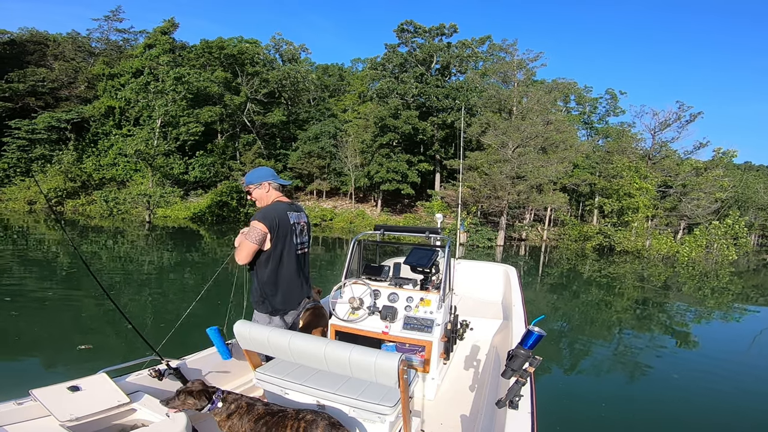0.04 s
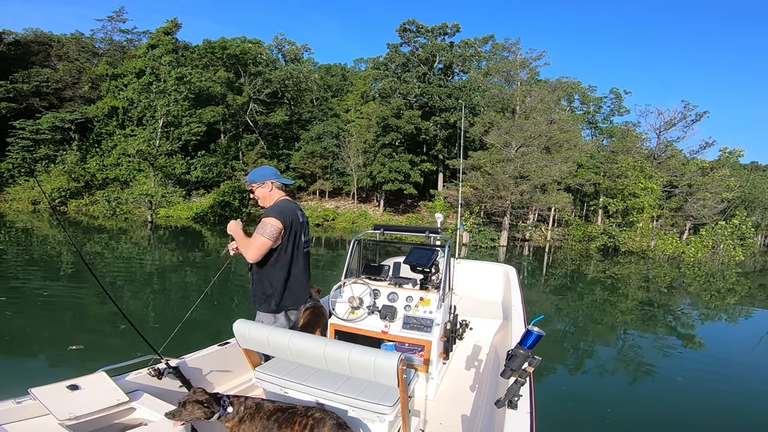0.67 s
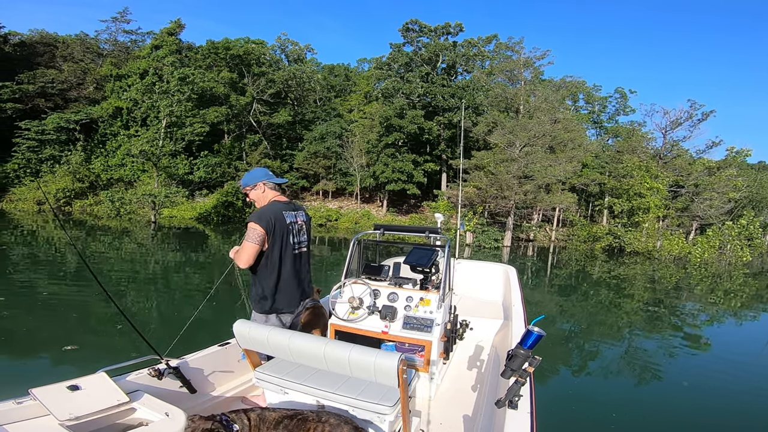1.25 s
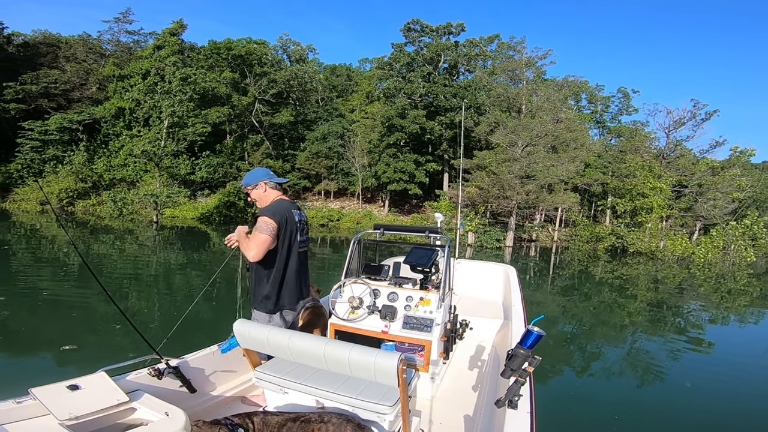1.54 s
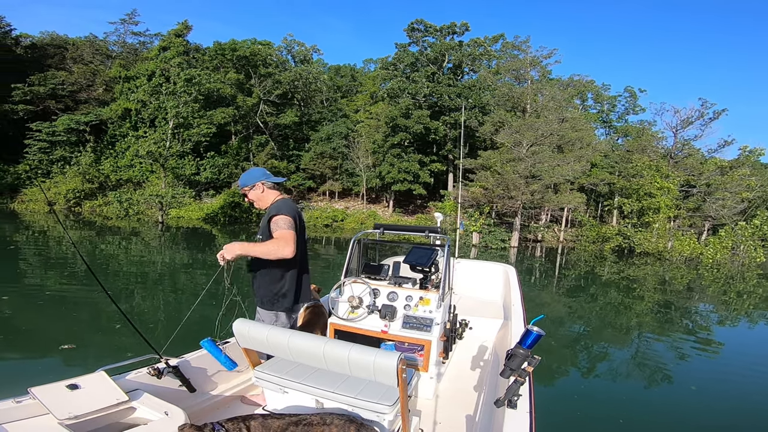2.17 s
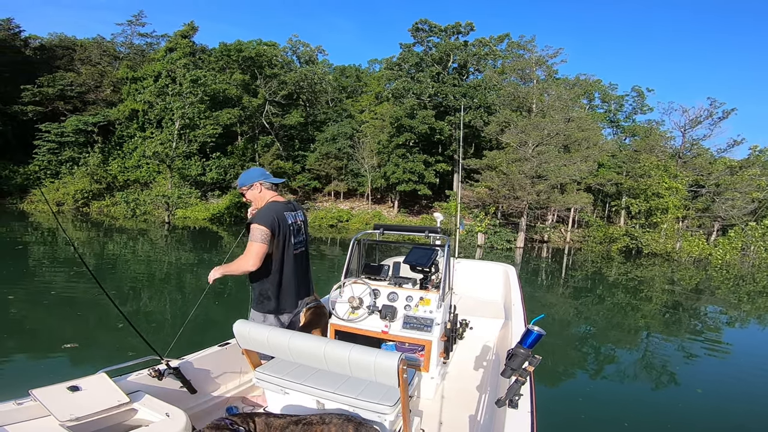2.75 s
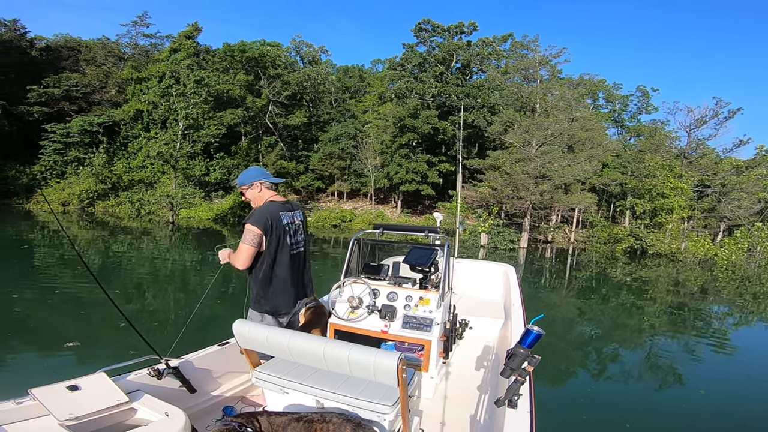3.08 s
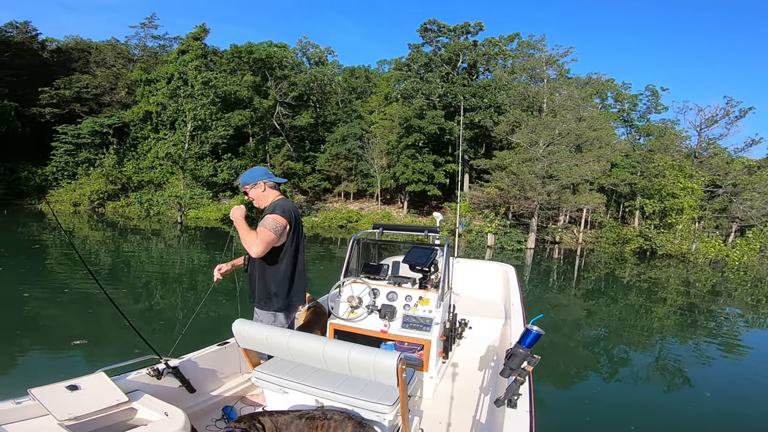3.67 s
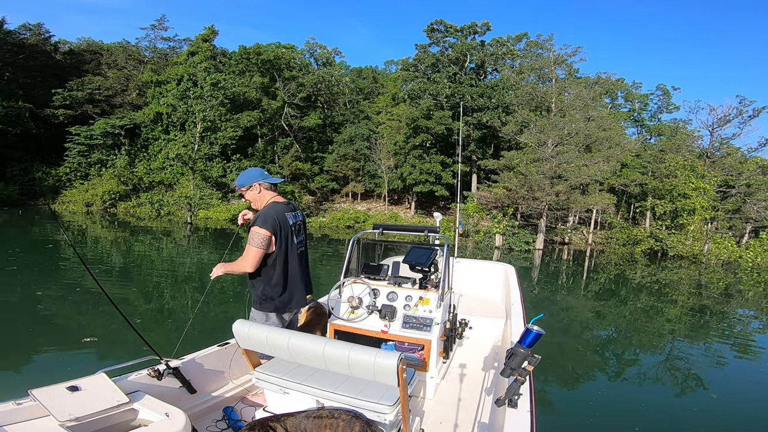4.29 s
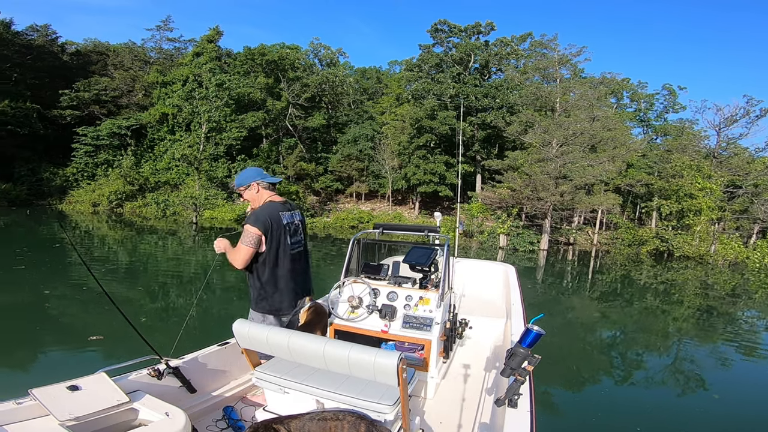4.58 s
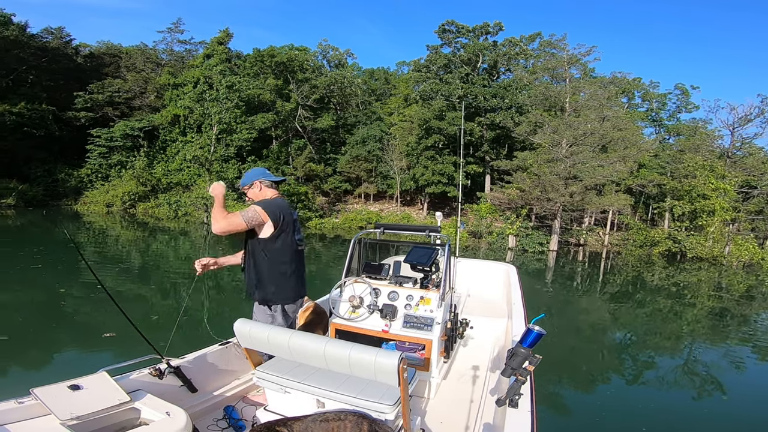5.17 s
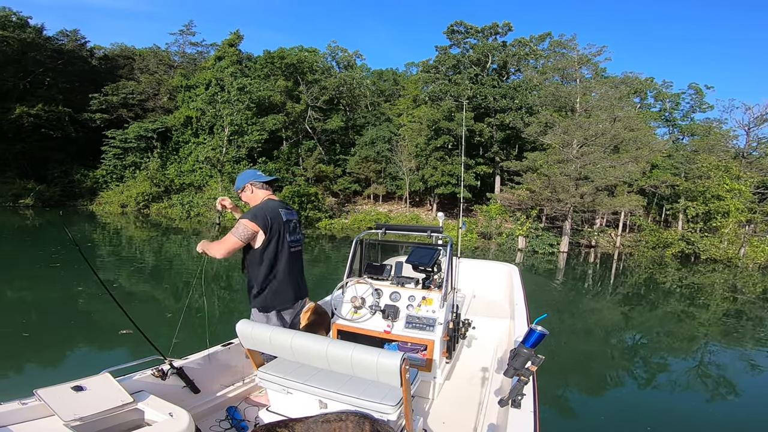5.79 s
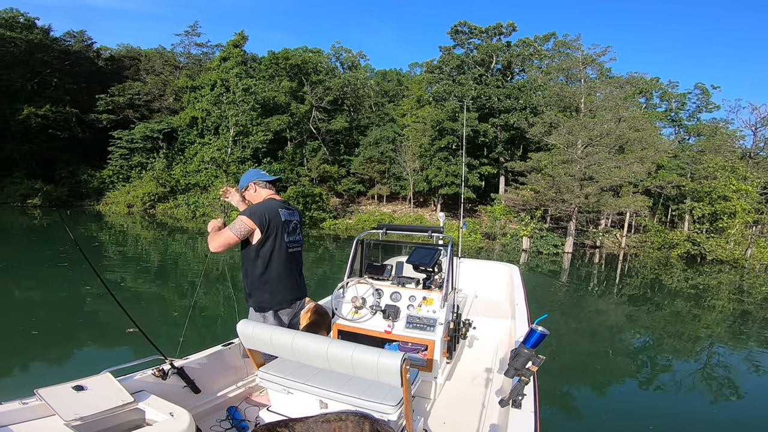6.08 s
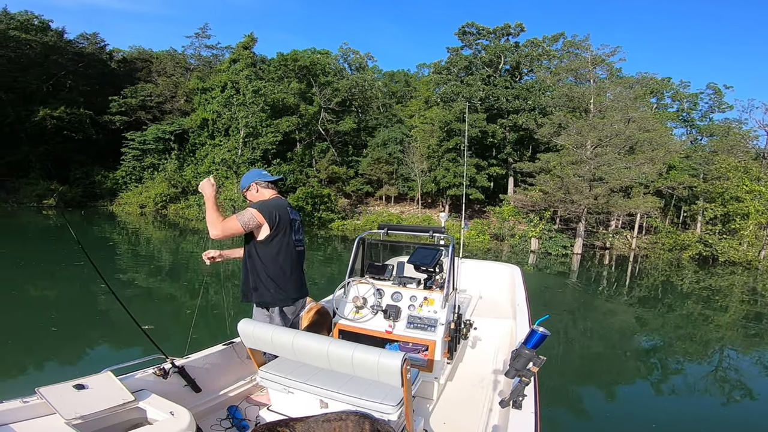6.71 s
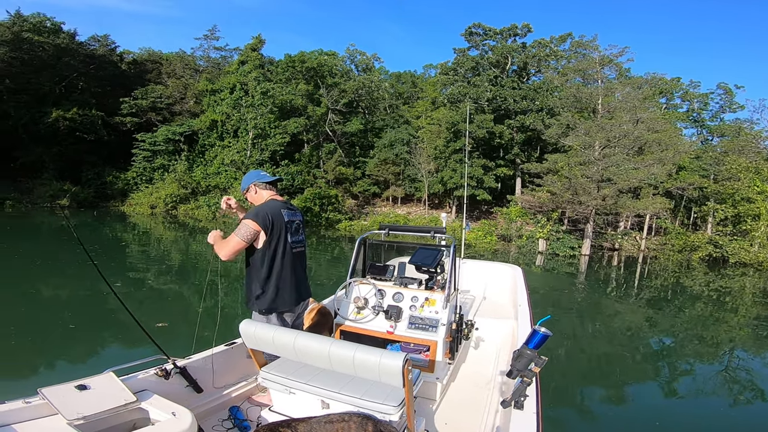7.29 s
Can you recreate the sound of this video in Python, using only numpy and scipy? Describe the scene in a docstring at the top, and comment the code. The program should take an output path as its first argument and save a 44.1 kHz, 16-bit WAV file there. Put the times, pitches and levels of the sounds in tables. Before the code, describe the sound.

A wet rope is hauled into a small fibreglass boat on a calm lake, heard from aboard. Soft swishes and irregular wet slaps sound over a steady low rumble and faint airy hiss. Around 0.9 and 1.1 seconds a hollow float clacks loudly on deck with dull hull thumps. A bird chirps quickly at 1.4 seconds. More loud clacks and a thump come between 2.5 and 2.8 seconds. From 2.8 to 4.5 seconds a songbird sings high falling whistles, quickening at the end and echoing from the wooded shore. The rope keeps slapping until about 5 seconds, then thins out. At 5.4 seconds shifting weight draws a deep boom from the hull, with softer ones near the end. A faint distant trill runs from 6 to 7 seconds. Faint, low gliding drones sit far off in the first second and from about 5 seconds on.

```python
"""A wet rope swishes and slaps on deck, hauled hand over hand into a small fibreglass boat on a calm lake.
Its strands click by stick-slip friction. A hollow float knocks, and blows and shifting weight excite the
hull's modes. Behind lie a low rumble, far gliding drones and a high hiss of distant birds' echoes.
A songbird's falling whistles reverberate on the wooded shore; others chirp, slur and trill farther off."""
import sys
import numpy as np
from scipy import signal
from scipy.fft import rfft, irfft, next_fast_len
from scipy.io import wavfile
from scipy.ndimage import uniform_filter1d

SR = 44100
rng = np.random.default_rng(int(sys.argv[2]) if len(sys.argv) > 2 else 0)


def transcribe(signal):
    """Save signal, clipped to [-1, 1], as a 16-bit WAV file at the path in sys.argv[1]."""
    frames = np.atleast_2d(signal).T
    limited = np.clip(frames, -1, 1)
    pcm = np.round(limited * 32767).astype(np.int16)
    wavfile.write(sys.argv[1], SR, pcm)


N = 332734
TIME = np.arange(N) / SR


def from_db(db):
    """Amplitude ratio of a level; the levels within each table are relative."""
    return 10 ** (np.asarray(db) / 20)


def envelope(rows):
    """Gain interpolated between rows of t/s, level/dB."""
    return from_db(np.interp(TIME, *np.transpose(rows)))


def add(out, s, sound):
    """Superposition: mix a sound in from time s on."""
    at = round(s * SR)
    part = sound[max(-at, 0):max(N - at, 0)]
    out[max(at, 0):max(at, 0) + len(part)] += part


def coloured(x, colour, tilt_db=0):
    """Spectral shaping, tilted by tilt_db per octave about 1 kHz; rms 1."""
    octave = np.log2(np.fft.rfftfreq(len(x), 1 / SR) + 1)
    hz, db = np.transpose(colour)
    gain = from_db(np.interp(octave, np.log2(hz), db) + tilt_db * (octave - 10))
    shaped = irfft(rfft(x) * gain, len(x))
    return shaped / np.sqrt(np.mean(shaped ** 2) + 1e-20)


def noise(colour):
    """Stationary noise of a given spectrum; rms 1."""
    return coloured(rng.standard_normal(next_fast_len(N)), colour)[:N]


def drift(rate, size=N):
    """Random modulation of spread about 1, with rate new values a second."""
    return np.interp(TIME[:size] * rate, np.arange(8192), rng.standard_normal(8192))


def swell(t, rise, t60):
    """Exponential growth, 20 dB per rise time, to 1 at t = 0; then exponential decay."""
    return from_db(np.where(t < 0, 20 * t / rise, -60 * t / t60))


def ring(modes, scatter_db, contact_s, length=1):
    """Free vibration: damped modes of scattered strength build up over the contact."""
    t = TIME[:SR // 2]
    tones = sum(from_db(db + scatter_db * rng.standard_normal() - 60 * t / (t60 * length))
                * np.sin(2 * np.pi * hz * t) for hz, db, t60 in modes)
    return tones * (1 - np.exp(-(t / contact_s) ** 2))


def arch(s, db, length, start, middle, end, edge_db, growth_db=0):
    """Parabolic contour through three pitches, as rows of t/s, f/Hz, level/dB."""
    u = np.linspace(-1, 1, 17)
    hz = middle + u * (end - start) / 2 + u ** 2 * ((start + end) / 2 - middle)
    return np.column_stack([s + length * (u + 1) / 2, hz, db + edge_db * u ** 2 + growth_db * u / 2])


def glide(rows, waver, waver_rate, fade_s):
    """Frequency modulation: a wavering sine follows rows of t/s, f/Hz, level/dB."""
    s, hz, db = np.transpose(rows)
    t = np.arange(s[0], max(s[-1], s[0] + .01), 1 / SR)
    pitch = uniform_filter1d(np.interp(t, s, hz), size=200) * (1 + waver * drift(waver_rate, len(t)))
    fade = np.clip(np.minimum(t - t[0], t[-1] - t) / fade_s, 0, 1)
    return np.sqrt(2) * fade * from_db(np.interp(t, s, db)) * np.sin(2 * np.pi * np.cumsum(pitch) / SR)


def whistles(notes):
    """Nearly pure tones with a quick, slight frequency jitter."""
    out = np.zeros(N)
    for note in notes:
        add(out, note[0][0], glide(note, waver=.013, waver_rate=400, fade_s=.003))
    return out


def reflections(x, t60, onset_s):
    """Diffuse reverberation: convolution with a decaying noise of unit energy."""
    t = TIME[:2 * SR]
    tail = rng.standard_normal(len(t)) * from_db(-60 * t / t60) * (1 - np.exp(-t / onset_s))
    return signal.fftconvolve(x, tail / np.linalg.norm(tail))[:N]


def echoes(x, t60, wet_db, onset_s):
    """Direct sound plus its reverberant field."""
    return x + from_db(wet_db) * reflections(x, t60, onset_s)


def through_leaves(x):
    """Multiple scattering in foliage smears a whistle."""
    return echoes(x, t60=.08, wet_db=0, onset_s=.001)


# Spectra of the rumble, the open air and the high hiss of distant birds' echoes: f/Hz, level/dB
RUMBLE_SPECTRUM = [(20, -18), (80, 0.5), (115, -2), (150, 2.5), (200, -1.5), (260, -4), (340, -9.5),
                   (430, -17.5), (600, -28), (1000, -55), (2000, -92)]
AIR_SPECTRUM = [(200, -8), (600, 1.5), (820, 6.5), (1050, -6.5), (1300, -4.5), (1900, -14), (3000, -20.5),
                (5000, -17), (7100, -22.5), (8200, -18), (10500, -26.5), (12300, -21), (15500, -24)]
FAR_BIRD_HISS_SPECTRUM = [(2000, -6.5), (3200, -14.5), (4100, 4.5), (4700, 2), (5200, -7.5), (6200, -16),
                          (9000, -42)]
# Envelopes of the rumble and the high hiss: t/s, level/dB
RUMBLE_LEVELS = [(0, -28.5), (1.0, -29.5), (1.35, -31.5), (2.6, -28), (3.3, -29.5), (4.1, -28),
                 (5.5, -29.5), (7.54, -30.5)]
FAR_BIRD_HISS_LEVELS = [(0, -68), (.6, -59.5), (1.8, -58.5), (5.6, -63.5), (6.3, -63), (6.75, -55.5),
                        (7.1, -58.5), (7.3, -64.5), (7.54, -68)]

def lakeside():
    """Ambient noise: rumble, open air and the hiss of far birds' echoes are amplitude-modulated bands."""
    rumble = from_db(2) * envelope(RUMBLE_LEVELS) * noise(RUMBLE_SPECTRUM)
    air = from_db(-46.5 + .5 * drift(1.5)) * noise(AIR_SPECTRUM)
    hiss_gain = envelope(FAR_BIRD_HISS_LEVELS) * from_db(8.5 + 1.6 * drift(25))
    far_bird_hiss = hiss_gain * noise(FAR_BIRD_HISS_SPECTRUM)
    return rumble + air + far_bird_hiss


# Far drones: t/s, level/dB, duration/s, start f/Hz, middle f/Hz, end f/Hz
DRONE_GLIDES = [(-.1, -26.5, 1.15, 197, 207.2, 225), (4.7, -29.5, 1.7, 243, 204.5, 170),
                (5.86, -28.5, 0.595, 276.3, 261.5, 257), (6.65, -29.5, 0.774, 227.3, 212.4, 206.6),
                (7.36, -22, 0.17, 194.3, 197.3, 199)]

def far_drones():
    """Slow modulation: low tones swell and fade as their frequency glides."""
    out = np.zeros(N)
    for row in DRONE_GLIDES:
        add(out, row[0], glide(arch(*row, edge_db=-6), waver=.0047, waver_rate=15.6, fade_s=.015))
    return out * from_db(-1.5 + 1.26 * drift(10))


# Stray slurs of far birds: t/s, level/dB, duration/s, start f/Hz, end f/Hz
SLUR_NOTES = [(0.334, -49, 0.13, 2640, 2500), (0.563, -56, 0.14, 2640, 2900), (1.927, -56, .06, 2900, 3790),
              (1.998, -51, 0.044, 3000, 4300), (3.123, -50, 0.082, 2500, 2310),
              (5.018, -48.5, 0.074, 2650, 2360), (5.43, -47.5, 0.07, 2590, 2350),
              (5.458, -47, 0.037, 4360, 3520), (5.523, -56, 0.086, 3400, 2950)]

def far_slurs():
    """Linear sweeps arrive mostly as scattered and reflected sound."""
    notes = [[(s, start, db), (s + span, end, db)] for s, db, span, start, end in SLUR_NOTES]
    return from_db(-5) * echoes(through_leaves(whistles(notes)), t60=.82, wet_db=-2, onset_s=.003)


def far_trill(start_s=5.915, period_s=.126, slur_s=.048, low_hz=3150, high_hz=4550):
    """Periodic frequency modulation: a bird slurs up, then more softly down, in a crescendo."""
    notes = []
    for since in period_s * np.arange(10):
        db = -51.5 + 3.5 * since + 2 * rng.uniform(-.95, 1)
        top_hz = high_hz * (1 + .04 * rng.uniform(-.95, 1))
        s = start_s + since
        turn = s + slur_s
        notes.append([(s, low_hz, db - 12), (turn, top_hz, db)])
        notes.append([(turn, top_hz, db - 6), (turn + slur_s, low_hz, db - 18)])
    return echoes(whistles(notes), t60=.55, wet_db=3, onset_s=.0028)


# A second bird's chirps: t/s, level/dB, duration/s, start f/Hz, middle f/Hz, end f/Hz
CHIRP_NOTES = [(1.385, -31.5, 0.063, 3570, 5270, 3615), (1.446, -36, .028, 5000, 5780, 4850),
               (1.535, -36.5, 0.031, 5920, 5800, 6080)]

def chirping_bird():
    """Parabolic sweeps, each growing louder, excite a reverberant tail."""
    notes = [arch(*row, edge_db=1, growth_db=7) for row in CHIRP_NOTES]
    return from_db(-2.5) * echoes(whistles(notes), t60=1.0, wet_db=-9.5, onset_s=.0032)


# Notes that slide, then hold their pitch: t/s, level/dB, start f/Hz, end f/Hz, slide/s, hold/s
SONG_NOTES = [(2.762, -25.5, 5630, 4630, 0.033, 0.036), (3.027, -23, 5870, 4726, 0.05, 0.064),
              (3.363, -19.5, 5600, 4635, 0.056, 0.07), (3.657, -18, 5540, 4424, .075, 0.037),
              (3.943, -23.5, 5990, 3200, 0.089, 0.0037), (4.159, -23.5, 6330, 3120, 0.061, 0.004),
              (4.318, -32, 5280, 3340, .042, 0.0035), (4.42, -31.5, 2800, 5210, 0.054, 0.012),
              (4.504, -41, 5480, 2720, 0.033, 0.00067)]

def songbird(leaf_cutoff_hz=4180):
    """Scattering by leaves blurs and dulls each whistle; the wood adds long reverberation."""
    notes = []
    for s, db, start, end, slide, hold in SONG_NOTES:
        length = slide + hold
        t = np.linspace(0, length, 40)
        crest_s = length - .4 * slide
        swell_db = np.interp(t, [0, crest_s, length], [-21.5, 0, -25.5])
        notes.append(np.column_stack([s + t, np.interp(t, [0, slide], [start, end]), db + swell_db]))
    song = whistles(notes)
    low_pass = signal.butter(4, leaf_cutoff_hz, fs=SR, output="sos")
    dulled = from_db(6) * signal.sosfilt(low_pass, through_leaves(song))
    return dulled + from_db(3.5) * reflections(song, t60=1.34, onset_s=.0013)


# Spectrum of the hull's murmur: f/Hz, level/dB
MURMUR_SPECTRUM = [(20, -13), (40, -15), (54, -18), (64, 1.5), (76, -3.5), (88, 3), (105, -9), (140, -7),
                   (300, -89)]
# Shifts of weight on deck: peak t/s, level/dB
WEIGHT_SHIFTS = [(.12, -25.5), (.72, -23), (.87, -23), (1.2, -25.5), (1.9, -30), (2.3, -26.5),
                 (2.62, -22.5), (3.0, -31.5), (3.4, -33), (3.87, -23.5), (4.05, -27.5), (4.22, -24.5),
                 (4.76, -31.5), (5.401, -12), (5.54, -24), (6.15, -32.5), (6.6, -32.5), (6.98, -23.5),
                 (7.15, -21.5), (7.3, -24.5), (7.44, -21)]

def hull_boom(mode_hz=65.7, wander=.02204):
    """Forced vibration: the harder the rocking hull is driven, the more its lowest mode stands out."""
    murmur = noise(MURMUR_SPECTRUM)
    murmur /= np.sqrt(uniform_filter1d(murmur ** 2, size=7000))
    mode = np.sqrt(2) * np.sin(2 * np.pi * np.cumsum(mode_hz * (1 + wander * drift(12))) / SR)
    shift_power = sum((from_db(db) * swell(TIME - s, rise=.12, t60=1.43)) ** 2
                      for s, db in WEIGHT_SHIFTS)
    drive = np.sqrt(from_db(-37.5) ** 2 + shift_power)  # a faint murmur persists between shifts
    mode_share = np.minimum(drive / from_db(-13), .85)
    return from_db(2) * drive * (np.sqrt(mode_share) * mode + np.sqrt(1 - mode_share) * murmur)


# Normal modes of the hull: f/Hz, level/dB, T60/s
HULL_RESONANCES = [(65, 1, 0.11), (153.1, 8, 0.19), (194.9, 9.5, 0.19), (216, 7.5, 0.16), (337, -4, 0.27)]
# Dull blows on the hull: t/s, level/dB, push f/Hz, ring re push/dB
HULL_BLOWS = [(0.9216, 1.5, 114, -25.5), (1.083, -2.5, 225, -12.5), (1.099, 1.9, 182, -20.5),
              (1.112, -7, 168, -13.5), (2.567, 2.5, 187, -21.5), (2.681, -12, 166, -20)]

def hull_thumps(push_cycles=.58):
    """Transient response: a soft blow flexes a panel in and out, then the hull rings freely."""
    out, t = np.zeros(N), TIME[:2048] - TIME[1024]
    for s, db, hz, ring_db in HULL_BLOWS:
        push = np.cos(2 * np.pi * hz * t) * np.exp(-(t * hz / push_cycles) ** 2)
        body = ring(HULL_RESONANCES, scatter_db=1, contact_s=.004)
        add(out, s + t[0], from_db(db) * push)
        add(out, s - .25 / hz, from_db(db + ring_db) * body)  # starts a quarter cycle before the peak
    return out


# Normal modes of the float: f/Hz, level/dB, T60/s
FLOAT_RESONANCES = [(612, -9.5, 0.052), (811, 0, 0.034), (878, 0, 0.013), (1075, -8, 0.071),
                    (1212, -20.5, 0.047), (1283, -8.5, .03), (1880, -27, 0.059), (1910, -32, 0.08),
                    (2380, -54, 0.024), (2980, -35, 0.13)]
# Hard contacts of the float: t/s, level/dB, decay time as a fraction of the free ring
FLOAT_IMPACTS = [(0.366, -30.5, 0.9), (.9157, -5.5, 0.26), (.9215, -9, 0.28), (0.926, -11.5, 0.22),
                 (1.078, -12.5, 0.21), (2.563, -5, 0.77), (2.571, -13, 0.57), (2.602, -12.5, 0.57),
                 (2.674, -18, 0.66), (2.75, -4.5, 0.38), (2.768, -17, 0.45), (4.299, -45, .7)]

def float_clacks():
    """Impact excitation: the hollow float hits the deck with a dull crack; contact damps its ring."""
    out, t = np.zeros(N), TIME[:SR // 2]
    crack_gain = from_db(-9 - 60 * t / .03) * (1 - np.exp(-(t / .0008) ** 2))
    for s, db, length in FLOAT_IMPACTS:
        crack = crack_gain * coloured(rng.standard_normal(len(t)), CONTACT_SPECTRUM, tilt_db=-2)
        body = ring(FLOAT_RESONANCES, scatter_db=1.5, contact_s=.0008, length=length)
        add(out, s, from_db(db + 3) * (body + crack))
    return echoes(out, t60=.078, wet_db=-6.5, onset_s=.0015)


# Spectrum of wet rope on fibreglass, shared by the float's crack: f/Hz, level/dB
CONTACT_SPECTRUM = [(200, 6), (500, 7.5), (1000, 3), (2000, -0.5), (3100, -8.5), (4200, -1.5),
                    (5200, -12.5), (6200, -22.5), (7200, -40), (9000, -43), (15000, -77)]
# Coils slap on the deck: t/s, level/dB, tilt/(dB per octave)
COIL_SLAPS = [(.144, -51, 16), (0.288, -38.5, 4.5), (.310, -38, 3), (.477, -38, 4), (.648, -34, 7.5),
              (.669, -35.5, 1.5), (0.922, -33, -3), (1.072, -32, -1), (1.085, -35.5, 0), (1.722, -42, 8),
              (2.243, -36, -4), (2.423, -41, 5.5), (2.570, -24.5, -1.5), (2.636, -44, 11),
              (2.676, -31.5, 0), (2.751, -40.5, 13), (2.768, -24.5, -1), (3.209, -27, -4),
              (3.350, -35.5, -3.5), (3.686, -43.5, 12), (3.819, -32, 8.5), (3.845, -32, 7),
              (4.818, -29.5, 0.5), (4.838, -26.5, -3), (4.944, -29.5, -2), (5.630, -48.5, 9.5),
              (6.49, -58.5, 4), (7.135, -51, 5), (7.346, -56, 18)]
# Slides over the gunwale and through the hands: peak t/s, level/dB, rise/s, tilt/(dB per octave), zip/dB
ROPE_SLIDES = [(0.119, -39.5, 0.097, 2.5, 8.5), (.425, -40, .07, 0, 3), (.705, -40, 0.068, 0, 12),
               (.99, -41, 0.071, -1.5, -7), (1.192, -25.5, 0.033, -4, 1), (1.429, -41.5, 0.065, 4.5, 4),
               (1.611, -39.5, .008, 7, 13.5), (1.637, -41, 0.021, 0, 6), (1.83, -44, 0.045, 1.5, 6),
               (4.734, -43, 0.0033, -1.5, 4), (5.267, -44, 0.0027, -3.5, 16), (6.67, -47, 0.0027, -2.5, 5)]

def rope(slips_per_s=3000, zip_hz=1700, zip_octaves=.27):
    """Stick-slip friction: strands click in swarms that swell and die; the sliding braid adds a zip."""
    out, t = np.zeros(N), TIME[:16384] - TIME[6000]
    hz = np.geomspace(100, 16000, 60)
    contact_hz, contact_db = np.transpose(CONTACT_SPECTRUM)
    base_db = np.interp(np.log(hz), np.log(contact_hz), contact_db)
    zip_band = np.exp(-(np.log2(hz / zip_hz) / zip_octaves) ** 2)
    # A bright, wet slap has less zip; a slide that starts slowly also ends slowly.
    slaps = [(s, db, .0087, .11, tilt, 2.5 - .7 * tilt) for s, db, tilt in COIL_SLAPS]
    slides = [(s, db, rise, .16 + .7 * rise, tilt, zip_db) for s, db, rise, tilt, zip_db in ROPE_SLIDES]
    for s, db, rise, t60, tilt, zip_db in slaps + slides:
        slips = rng.random(len(t)) < slips_per_s / SR
        sizes = from_db(4.5 * np.minimum(rng.exponential(1, len(t)), 3))
        signs = rng.choice([-1, 1], len(t))
        spectrum = np.column_stack([hz, base_db + zip_db * zip_band])
        friction = coloured(slips * sizes * signs, spectrum, tilt)
        add(out, s + t[0], from_db(db) * swell(t, rise, t60) * friction)
    return from_db(7.5) * out


def scene():
    """Superposition of boat, birds and lake in one channel."""
    boat = rope() + float_clacks() + hull_thumps() + hull_boom()
    birds = songbird() + chirping_bird() + far_trill() + far_slurs()
    return (boat + birds + far_drones() + lakeside())[None]


def record(dry, ceiling=1.08, lag_s=.000979, cutoff_hz=15600):
    """Peaks saturate, interference with a delayed copy hollows the sound, and a low-pass cuts the top."""
    size = next_fast_len(N + 1000)
    hz = np.fft.rfftfreq(size, 1 / SR)
    clipped = dry / (1 + (dry / ceiling) ** 10) ** .1
    comb = (1 + .96 * np.exp(-2j * np.pi * hz * lag_s)) / 2
    hollow = irfft(rfft(clipped, size) * comb, size)[:, :N]
    low_pass = signal.ellip(12, .1, 80, cutoff_hz, fs=SR, output="sos")
    return signal.sosfilt(low_pass, hollow)


dry = scene()
out = record(dry)
transcribe(out)
```